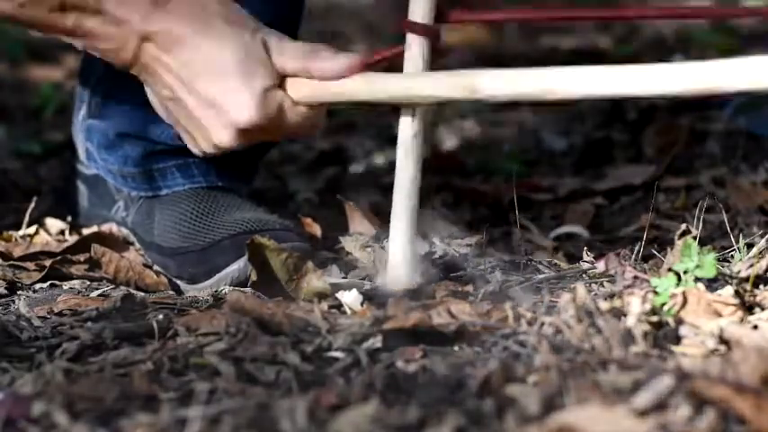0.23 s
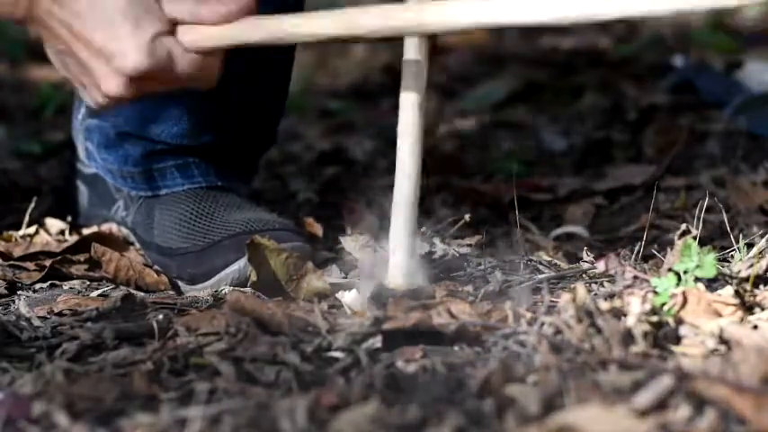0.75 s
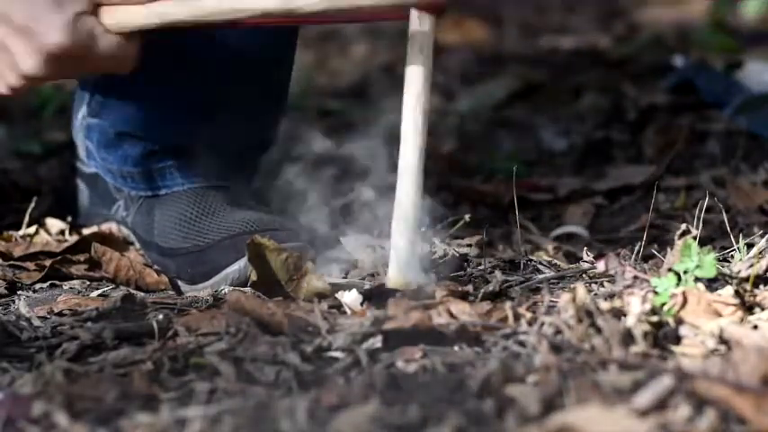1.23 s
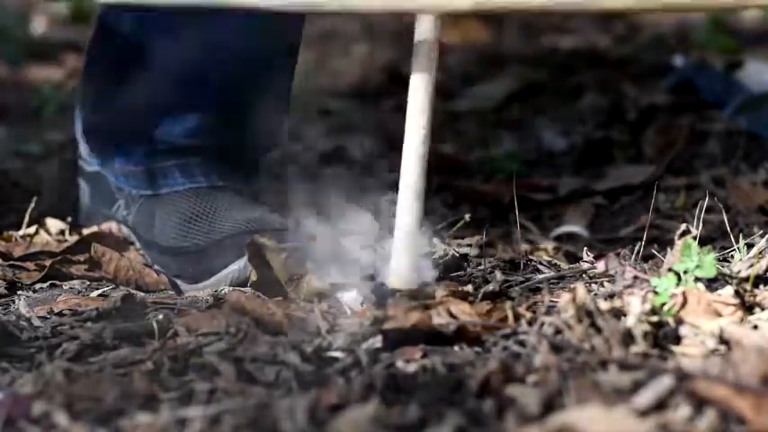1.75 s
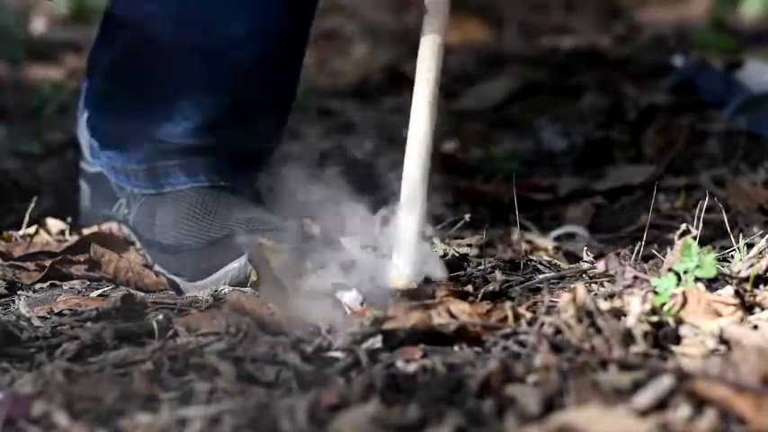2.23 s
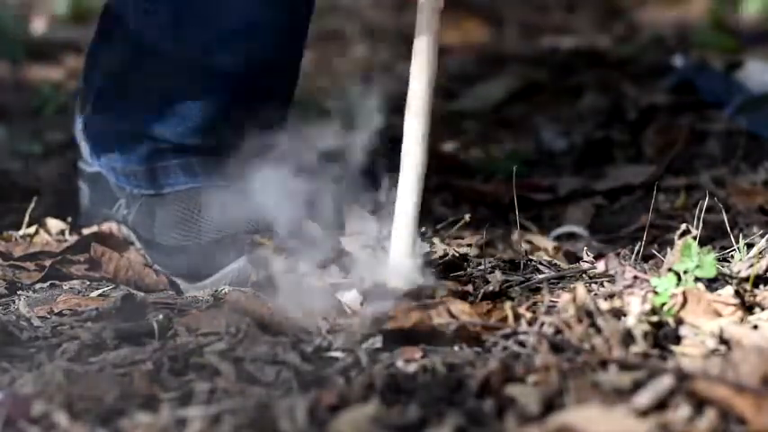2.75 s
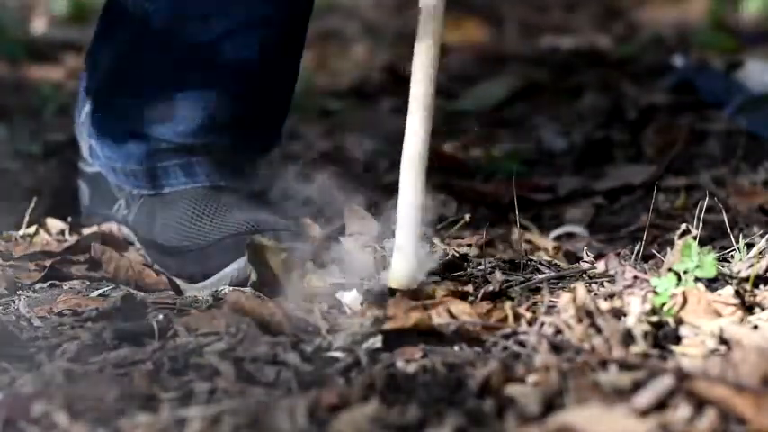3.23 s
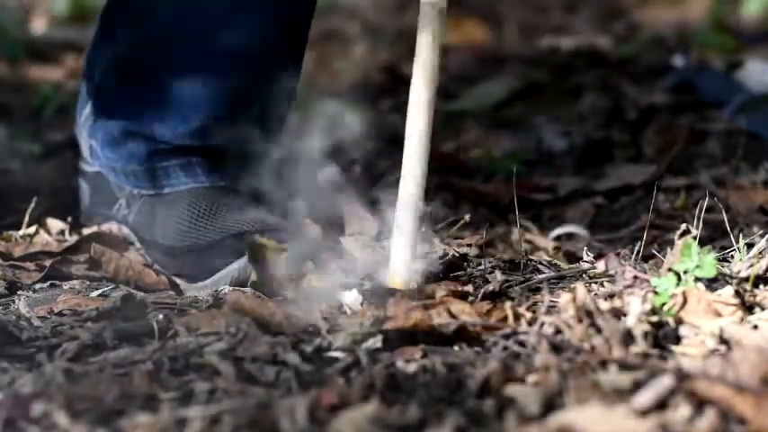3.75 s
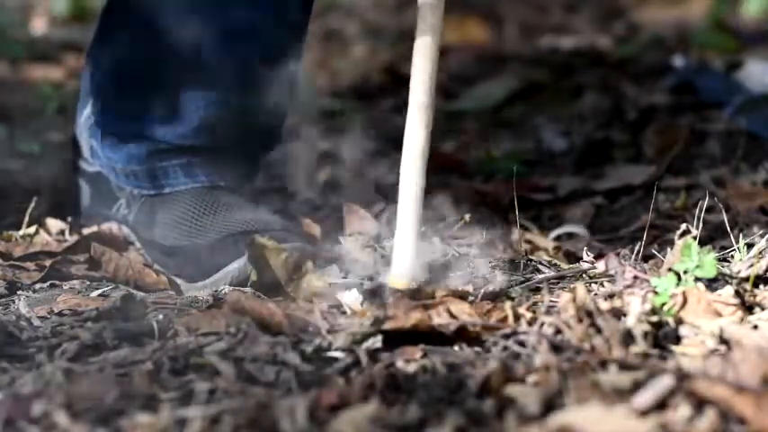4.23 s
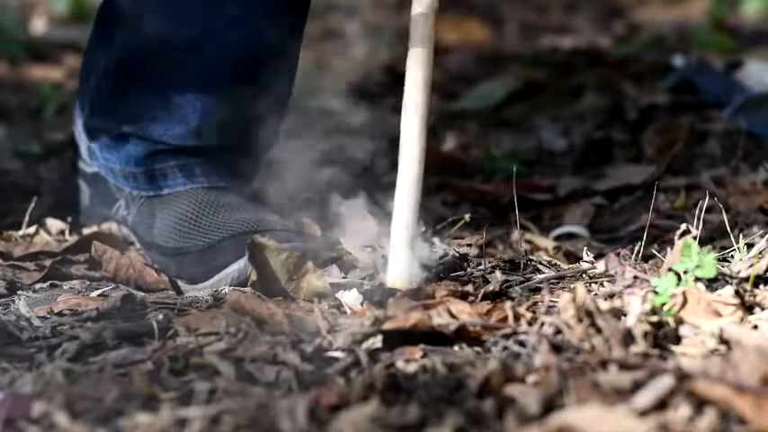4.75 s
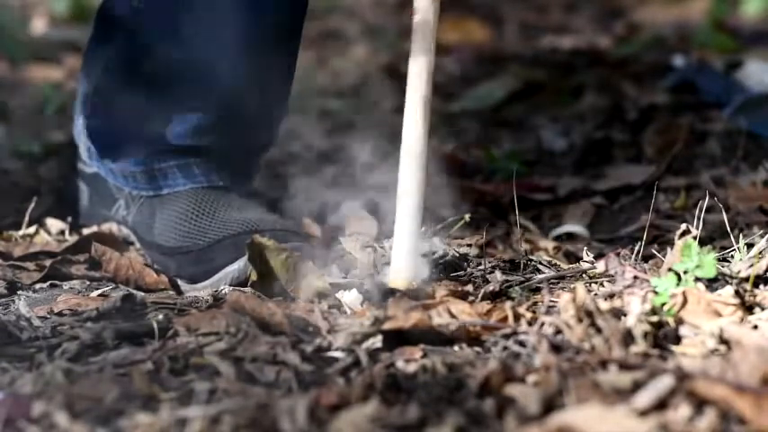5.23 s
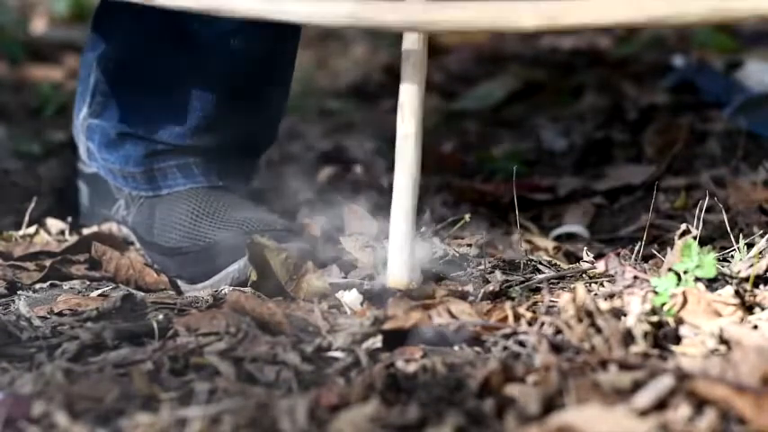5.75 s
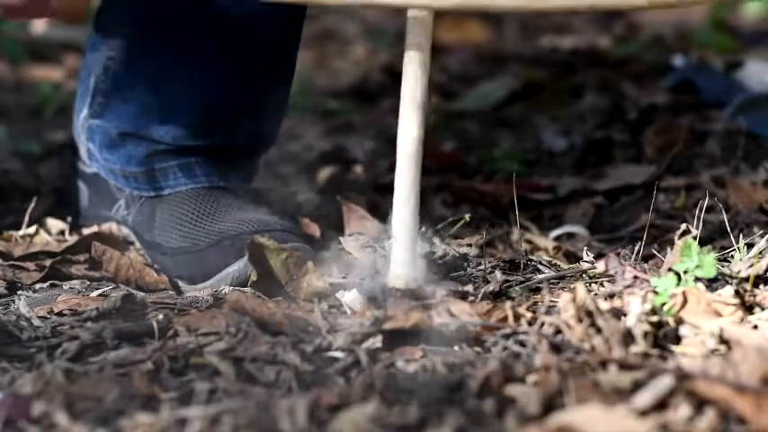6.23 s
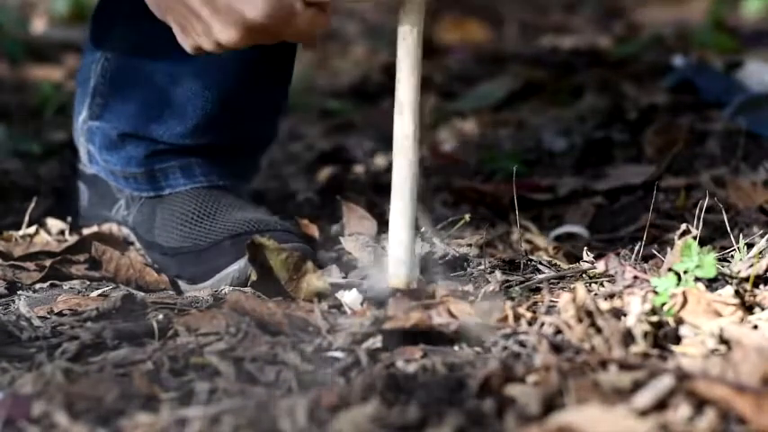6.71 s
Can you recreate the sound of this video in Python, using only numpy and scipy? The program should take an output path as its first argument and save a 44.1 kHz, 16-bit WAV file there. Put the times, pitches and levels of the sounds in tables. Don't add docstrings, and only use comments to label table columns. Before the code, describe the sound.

Close outdoors, a wooden spindle is spun to and fro in a board. Dry, hollow grinding swells and fades about four times a second, each push brighter than the pull back. From about two and a half seconds, several pushes break into very short, loud, shrill double or triple squeals. Tiny chirps and a few faint twig snaps dot the rasping. It stops near the end, leaving soft distant traffic.

```python
import sys
import numpy as np
from scipy import signal
from scipy.fft import rfft, irfft, next_fast_len
from scipy.io import wavfile
from scipy.ndimage import uniform_filter1d, minimum_filter1d, map_coordinates

SR = 44100
rng = np.random.default_rng(int(sys.argv[2]) if len(sys.argv) > 2 else 0)


def rack_gain(trim_db):
    fader = np.asarray(trim_db, float)
    return 10 ** (fader / 20)


def digitize_waveform(pressure):
    field = np.atleast_2d(pressure).T
    bounded = np.clip(field, -1, 1)
    quanta = np.round(bounded * 32767).astype(np.int16)
    wavfile.write(sys.argv[1], SR, quanta)


N = 307818


def unit(x):
    return x / np.sqrt(np.mean(x ** 2) + 1e-20)


def along(points, hz):
    f, v = np.transpose(points)
    return np.interp(np.log(hz + 1), np.log(f + 1), v)


def wobble(rate):
    knots = rng.standard_normal(int(N * rate / SR) + 4)
    return map_coordinates(knots, [np.arange(N) * rate / SR])


def filtered(x, response):
    m = next_fast_len(N + 8192)
    return irfft(rfft(x, m) * response(np.fft.rfftfreq(m, 1 / SR)), m)[:N]


def mode(f, hz, width):
    return 1j * f * width / (hz * hz - f * f + 1j * f * width)


def hiss(spectrum):
    return unit(filtered(rng.standard_normal(N), lambda f: rack_gain(along(spectrum, f))))


def swell(t, length, rise_db, fall_db, round_ms, corner_db):
    before = np.maximum(-t, 0)
    after = np.maximum(t - length, 0)
    below = before * rise_db + after * fall_db

    def corner(u):
        return corner_db * np.exp(-1000 * np.clip(u, 0, None) / round_ms)

    return rack_gain(-1000 * below - corner(1.3 * t) - corner(length - t))


# (start [s], share of stroke at top speed, grinding [dB], board mode [dB], tip mode [dB])
PUSH_STROKES = [(-0.02, 0.64, -50, 6.5, 18), (0.436, 0.56, -50, 6.5, 16), (0.905, .52, -50.5, -1, 16),
                (1.35, 0.51, -51, .5, 16.5), (1.81, 0.65, -50.5, -7.5, 19), (2.31, 0.66, -49.5, -0.5, 16.5),
                (2.81, 0.6, -51, 10, 19.5), (3.314, 0.61, -49.5, 7.5, 18), (3.80, .6, -48.5, 5, 16),
                (4.29, 0.69, -49.5, 5, 18.5), (4.81, 0.58, -48, 9, 17.5), (5.32, 0.46, -50.5, 10.5, 17.5),
                (5.83, 0.68, -48.5, 8.5, 20), (6.35, .5, -49.5, 7.5, 13)]
# (start [s], share of stroke at top speed, grinding [dB], board mode [dB], tip mode [dB])
PULL_STROKES = [(0.208, 0.48, -51.5, 12, 12.5), (0.678, 0.33, -53, 11, 12.5), (1.12, 0.49, -52, 9.5, 10.5),
                (1.586, 0.39, -52.5, 10.5, 13), (2.04, .42, -53.5, 11, 10.5), (2.556, 0.31, -53, 12, 15.5),
                (3.043, .4, -53, 13.5, 15), (3.541, .4, -51.5, 11, 14), (4.037, 0.54, -52, 15, 15.5),
                (4.55, .42, -52, 12.5, 11), (5.056, .38, -51.5, 13, 11), (5.585, 0.5, -52, 14.5, 11),
                (6.07, 0.5, -51, 13.5, 11)]
REST_S, PAUSE_S = 6.635, 0.0056
FULLNESS, LOW_DB = (1.49, 1.28), (9, 10)
LOW_FOLLOWS = .3
SLOW_DB = (0.5, 1, -10)
IDLE_DB = -80.5


def bow():
    t = np.arange(N) / SR
    start, fastest, grind_db, board_db, tip_db = np.transpose(sorted(PUSH_STROKES + PULL_STROKES))
    k = np.clip(np.searchsorted(start, t) - 1, 0, None)
    duration = np.diff(start, append=REST_S)[k] - PAUSE_S
    done = np.clip((t - start[k]) / duration, 0, 1)
    fullness = np.array(FULLNESS)[k % 2]
    low_db = np.array(LOW_DB)[k % 2] + LOW_FOLLOWS * (board_db[k] - 9.5)
    top = np.clip(fastest[k], .1, .9)
    arc = np.where(done < top, done / top, (1 - done) / (1 - top))
    pace = np.sin(np.pi / 2 * arc) ** fullness
    levels = (low_db, board_db[k], tip_db[k])
    sing_db = [db + (1 - pace) * slow for db, slow in zip(levels, SLOW_DB)]
    return pace * rack_gain(grind_db[k]) + rack_gain(IDLE_DB), sing_db


# (frequency [Hz], width [Hz])
SINGING_MODES = [
    (1500, 200),
    (2200, 240),
    (3330, 270),
]
# (frequency [Hz], width [Hz])
UPPER_MODES = [(2900, 220), (3800, 500), (4400, 350), (5500, 500), (6150, 520), (6900, 450), (8080, 400),
               (9900, 800), (11800, 1300)]
UPPER_LEVELS = [5.5, -3, -11.5, -17.5, -10.5, -19.5, -13.5, -21.5, -25]
# (frequency [Hz], spectral level [dB])
FIBRE_SPECTRUM = [(500, -30), (1000, -9), (1850, -5), (2700, -3), (3900, -4), (4500, -14), (5000, -26),
                  (9000, -34), (14000, -41), (15500, -46)]
# (frequency [Hz], spectral level [dB])
SOIL_SPECTRUM = [(30, -32), (70, -14.5), (180, 0.5), (500, -12), (1000, -11.5), (2000, -71.5)]
FLECK_DB = (2.6, 3.6, 2.1)
EDGE_HZ, EDGE_WIDTH_HZ = 4690, 150


def upper_response(f):
    power = 0
    for (hz, width), db in zip(UPPER_MODES, UPPER_LEVELS):
        pair = rack_gain(db) * mode(f, hz, width) * mode(f, hz, 3 * width)
        power = power + np.abs(pair) ** 2
    return np.sqrt(power)


def grinding():
    speed, sing_db = bow()
    bite = speed ** 2 / (speed + rack_gain(-58))
    turns = np.cumsum(32 + 3 * wobble(4)) / SR
    load = bite * rack_gain(3.5 + 2 * np.sin(2 * np.pi * turns) + 0.47 * wobble(90))
    grit = rng.standard_normal(N) * rack_gain(2.2 * wobble(500))

    def ring(hz, width):
        return unit(filtered(grit, lambda f: mode(f, hz, width) * mode(f, hz, 3 * width)))

    sound = rack_gain(4.5) * unit(filtered(grit, upper_response))
    sound += rack_gain(8.5 + 1.9 * wobble(28)) * hiss(FIBRE_SPECTRUM)
    sound += rack_gain(3.5 + 1.3 * wobble(3.1)) * hiss(SOIL_SPECTRUM)
    for (hz, width), db, fleck_db in zip(SINGING_MODES, sing_db, FLECK_DB):
        flecks = rack_gain(fleck_db * wobble(70))
        sound += rack_gain(db - 5.0) * flecks * ring(hz, width)
    edge_db = 0.66 * sing_db[-1] - 21.5 + 3.7 * wobble(40)
    sound += rack_gain(edge_db) * ring(EDGE_HZ, EDGE_WIDTH_HZ)
    return load * sound


# (frequency [Hz], spectral level [dB])
TRAFFIC_SPECTRUM = [(20, -52), (45, -34.5), (106, -8), (150, -3.5), (200, -2.5), (260, -5), (500, -12),
                    (950, -8.5), (1300, -15), (2200, -19), (2750, -25), (3500, -23), (4700, -38),
                    (8000, -43.5), (12000, -48), (13000, -54.5), (15500, -67.5)]
# (time [s], traffic level [dB], machine whine level [dB])
BACKGROUND_LEVELS = [(0.0, -47, -64), (1.03, -48, -68), (2.08, -48, -53), (2.72, -46.5, -60),
                     (3.09, -45.5, -58.5), (3.46, -48.5, -53.5), (4.431, -47, -65), (4.649, -47.5, -76.5),
                     (6.04, -48.5, -60.5), (6.22, -49, -59), (6.98, -48, -51.5)]
WHINE_HZ = 1009


def traffic():
    s, *columns = np.transpose(BACKGROUND_LEVELS)
    wash_db, whine_db = [np.interp(np.arange(N) / SR, s, c) for c in columns]
    drift_hz = 1.5 * wobble(3)
    line = rack_gain(whine_db) * np.sin(2 * np.pi * np.cumsum(WHINE_HZ + drift_hz) / SR)
    breathing_db = 4 + 0.74 * wobble(3.6) + wobble(9)
    return rack_gain(wash_db + breathing_db) * hiss(TRAFFIC_SPECTRUM) + line


# (frequency [Hz], decay time by 60 dB [s])
TREE_DECAY = [(1000, .3), (3300, .42), (6500, .4), (10000, .15)]
# (frequency [Hz], level [dB])
BARK_REFLECTION = [(1000, -2), (3300, -2), (6400, 10), (10000, -7.5)]


def trees(x):
    hz, t, z = signal.stft(rng.standard_normal(SR // 2), SR, nperseg=256)
    bark_db = along(BARK_REFLECTION, hz)[:, None]
    decay_db = 60 * t / along(TREE_DECAY, hz)[:, None]
    tail = signal.istft(z * rack_gain(bark_db - decay_db), SR, nperseg=256)[1]
    delayed = np.pad(x, (600, 0))
    return signal.fftconvolve(delayed, tail / np.linalg.norm(tail))[:N]


# (time [s], length [ms], level [dB], starting pitch [Hz])
SQUEAL_LOCKS = [(0.0825, 7, -21, 3265), (1.4815, 6.5, -20.5, 3261), (1.9428, 7.3, -24.5, 3249),
                (2.414, 6.7, -19, 3284), (2.4426, 22.5, -0.8, 3309), (2.4656, 23.2, 4, 3116),
                (2.909, 8.7, -16.5, 3265), (2.9381, 6.9, -20, 3330), (2.9673, 13, -13, 3303),
                (3.4386, 13.7, -3.5, 3315), (3.4657, 19.6, 3.5, 3255), (3.9093, 16, -15, 3269),
                (3.938, 37, 4.5, 3290), (3.9672, 20.9, 1, 3152), (4.4205, 14.1, -10, 3316),
                (4.4492, 17.8, 2, 3305), (4.478, 20, 4.5, 3214), (4.918, 7.6, -20.5, 3233),
                (4.949, 21.6, 3.5, 3276), (4.9744, 22.3, 4, 3180), (5.9322, 15, -10, 3281),
                (5.9644, 21.2, 2, 3299), (5.9967, 19, 5, 3235)]
# (multiple, level [dB], growth power, gain per 100 Hz of sag [dB])
SQUEAL_OVERTONES = [(2, -33, 2.3, 4), (3, -36, 2.2, 1), (4, -54, 2.5, -4.5), (5, -50, 2.5, 2)]
# (frequency [Hz], spectral level [dB])
SLIP_SPECTRUM = [(1500, -44), (2600, -9.5), (3300, 3.5), (4200, -11), (5000, -8.5), (6500, -17),
                 (8000, -18), (10000, -17), (13000, -20.5), (15500, -17.5)]
CREST_HZ, CREST_MS, LATER_MS_PER_HZ = 3345, 14.5, .03
SAG_HZ_PER_MS, SAG_FADE_DB = 16, .5
QUICK_CLIMB = .7
GRIP_HZ = 92.6
LINGER_DB, LINGER_MS = -22.5, 11
WEAK_DB, WEAK_FADE_DB = -6, 0.16


def squeals():
    t = np.arange(N) / SR
    size, knots = np.zeros(N), []
    for s, ms, db, hz in SQUEAL_LOCKS:
        near = slice(round((s - .02) * SR), round((s + .07) * SR))
        since = t[near] - s
        since_ms = 1000 * np.clip(since, 0, None)
        climb_db = 8 + .6 * max(db + 8, 0)
        crest = min(.85 * ms, CREST_MS + LATER_MS_PER_HZ * (CREST_HZ - hz))
        fade_db = SAG_FADE_DB * np.clip(since_ms - crest, 0, None)
        if db < WEAK_DB:
            fade_db = fade_db + WEAK_FADE_DB * since_ms
        lock = swell(since, ms / 1000, rise_db=5, fall_db=7, round_ms=1.2, corner_db=climb_db)
        linger = swell(since, (ms + LINGER_MS) / 1000, rise_db=1.5, fall_db=2, round_ms=2, corner_db=3)
        size[near] += rack_gain(db - 1.2 - fade_db) * lock
        size[near] += rack_gain(db + LINGER_DB) * linger
        knots += [(s - .002, hz - GRIP_HZ), (s + .002, hz)]
        knots += [(s + .002 + crest / 3000, hz + QUICK_CLIMB * (CREST_HZ - hz))]
        knots += [(s + crest / 1000, CREST_HZ)]
        knots += [(s + .85 * ms / 1000, CREST_HZ - SAG_HZ_PER_MS * (.85 * ms - crest))]
    pitch = np.interp(t, *np.transpose(sorted(knots)))
    pitch = uniform_filter1d(pitch, size=130) + 16 * wobble(250)
    sag = (3300 - pitch) / 100
    phase = 2 * np.pi * np.cumsum(pitch) / SR
    growth = np.maximum(np.gradient(size), 0)
    grabbing = uniform_filter1d(growth, size=200, origin=90) * SR / 300
    size = size * rack_gain(0.29 * wobble(110))
    slip_force = size ** 2 + 2.8 * grabbing * size
    sound = size * np.sin(phase) + rack_gain(-43.5 + 2 * sag) * slip_force * hiss(SLIP_SPECTRUM)
    for k, db, power, sag_db in SQUEAL_OVERTONES:
        uneven = 1 + .5 * wobble(500)
        sound += rack_gain(db - 7.5 + sag_db * sag) * uneven * size ** power * np.sin(round(k) * phase)
    return sound


# (time [s], length [ms], level [dB], pitch [Hz])
TIP_RINGS = [(0.1385, 5.5, -32, 3280), (0.547, 6.7, -24, 3290), (0.577, 4.7, -24.5, 3140),
             (0.6014, 4.3, -33, 3340), (0.989, 6.8, -26, 3300), (1.4527, 8.2, -26.5, 3254),
             (1.968, 8.4, -23, 3340), (2.1188, 5.5, -26.5, 3240), (2.4958, 12.7, -14.5, 3190),
             (2.5192, 11, -22, 3260), (2.548, 3.2, -30, 3070), (3.4115, 11, -22.5, 3380),
             (3.5153, 17, -29, 3240), (4.0163, 18.7, -23.5, 3200), (4.043, 8.5, -27, 3179),
             (4.5305, 12, -28.5, 3220), (5.0246, 22.1, -29, 3140), (5.1485, 8.6, -26.5, 3340),
             (5.4291, 13, -29.5, 3320), (5.461, 7.7, -25, 3120), (6.0217, 4.2, -21, 3160),
             (6.0375, 4.6, -31, 3170), (6.045, 9.9, -29, 3251), (6.1605, 13.6, -19.5, 3245),
             (6.1787, 7.1, -24, 3210), (6.1905, 11, -26, 3340)]
# (time [s], length [ms], level [dB], pitch [Hz])
BOARD_RINGS = [(2.9328, 4.9, -26.5, 1300), (3.1324, 7.7, -33, 2190), (3.6323, 7, -30, 2250),
               (3.908, 19, -41, 4720), (4.1668, 2.2, -27, 2080), (4.2018, 6.4, -26, 2135),
               (4.416, 9.1, -33, 1340), (4.416, 9.8, -30, 2216), (4.417, 17, -36, 4620),
               (4.632, 6.8, -26.5, 2240), (4.6425, 9.2, -31, 2350), (4.6628, 5.7, -29, 2130),
               (4.6986, 6.8, -30, 2180), (4.917, 13, -41, 4600), (4.944, 4.9, -26, 1400),
               (5.1333, 8.5, -29, 1520), (5.1353, 2.2, -13, 2148), (6.1568, 4.4, -22, 2240),
               (6.178, 4.6, -14, 2135), (6.211, 5.5, -24, 2216), (6.2518, 6.7, -35, 2115),
               (6.134, 7.6, -30.5, 2140), (6.266, 7, -29, 2220), (5.668, 5.9, -34.5, 2200),
               (5.698, 8, -34, 2200), (4.722, 6.8, -31, 2240), (0.743, 7.7, -31, 2244),
               (6.4896, 13, -38, 1380)]


def catches():
    out, t = np.zeros(N + SR), np.arange(-441, 1323) / SR
    for rows, glide in ((TIP_RINGS, .01), (BOARD_RINGS, .03)):
        for s, ms, db, hz in rows:
            bend = 500 * glide / max(ms, 6) * (t - ms / 2000) ** 2
            ring = np.sin(2 * np.pi * hz * (t + bend))
            gain = swell(t, ms / 1000, rise_db=3.0, fall_db=8, round_ms=1.9, corner_db=5.5)
            out[round(s * SR) - 441:][:len(t)] += rack_gain(db - 1.0) * gain * ring
    return out[:N]


# (time [s], peak level [dB])
TWIG_SNAPS = [
    (1.3573, -36),
    (1.5678, -33.5),
    (2.801, -29),
]
# (frequency [Hz], level [dB], decay time by 60 dB [s])
TWIG_MODES = [(1700, -8, .015), (2250, 0, .024), (2800, -6, .015), (3200, -4, .02), (4200, -10, .015)]


def twig():
    out, t = np.zeros(N), np.arange(2205) / SR
    onset = 1 - np.exp(-t / .0004)
    for s, db in TWIG_SNAPS:
        ring = sum(rack_gain(level - 60 * t / t60) * np.sin(2 * np.pi * hz * t) for hz, level, t60 in TWIG_MODES)
        crack = uniform_filter1d(rng.standard_normal(len(t)), size=13)
        out[round(s * SR):][:len(t)] += rack_gain(db) * onset * (ring + 1.6 * rack_gain(-60 * t / .012) * crack)
    return out


def scene():
    drill = grinding() + squeals() + catches() + twig()
    return (drill + rack_gain(-30.5) * trees(drill) + traffic())[None]


def top_cut(x):
    return signal.sosfilt(signal.butter(12, 15760, fs=SR, output="sos"), x)


LIMIT_DB, SQUEEZE = -8, .6
TOP_HZ = 15770


def record(dry):
    needed = np.minimum(1, rack_gain(LIMIT_DB) / (np.abs(dry[0]) + 1e-9)) ** SQUEEZE
    gain = uniform_filter1d(minimum_filter1d(needed, size=60), size=60)
    mix = filtered(dry[0] * gain, lambda f: f < TOP_HZ)[None]
    return top_cut(mix)


dry = scene()
out = record(dry)
digitize_waveform(out)
```